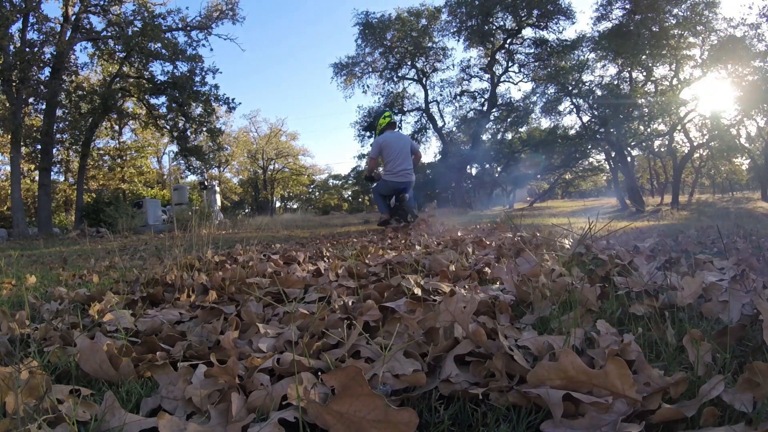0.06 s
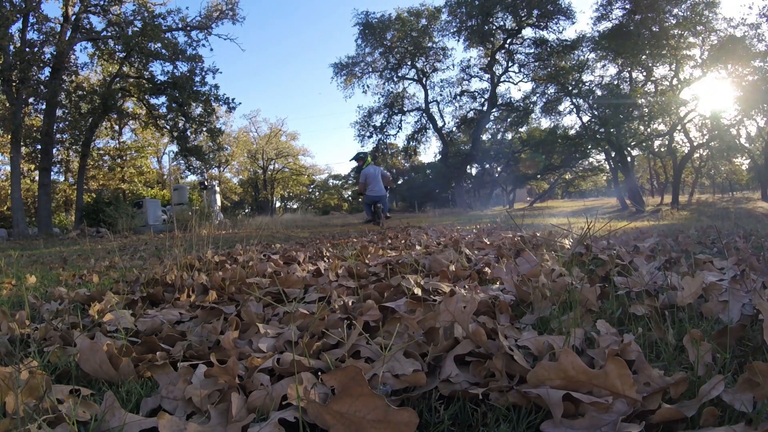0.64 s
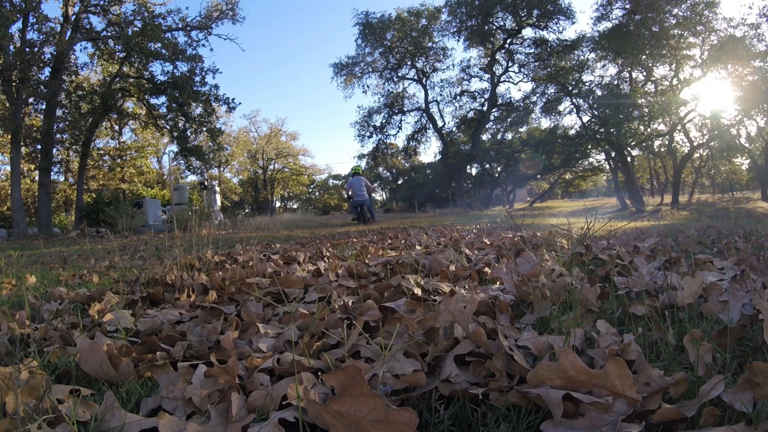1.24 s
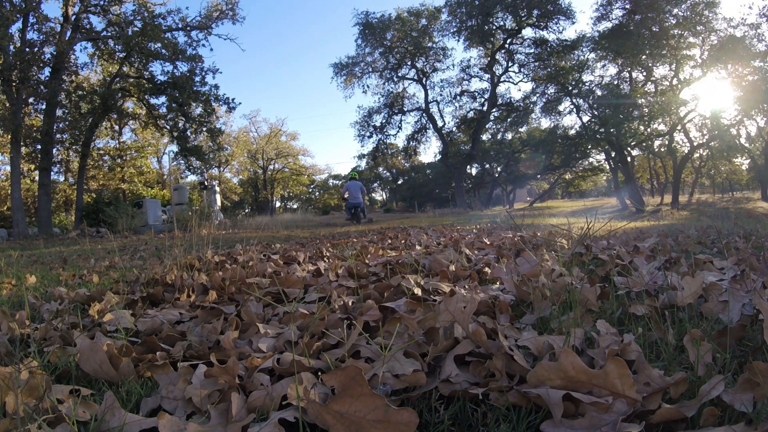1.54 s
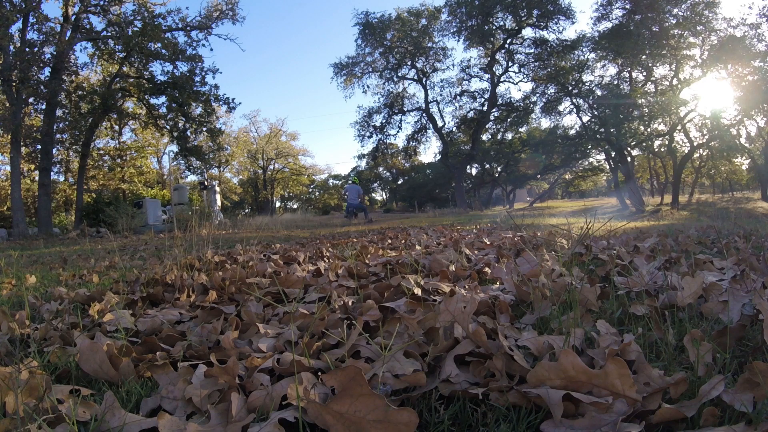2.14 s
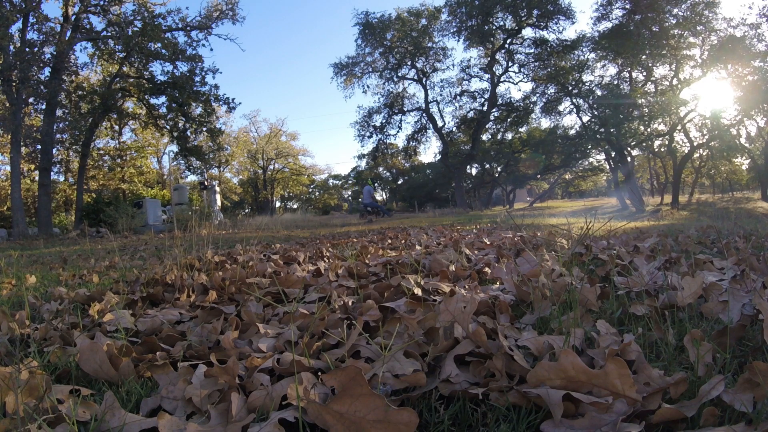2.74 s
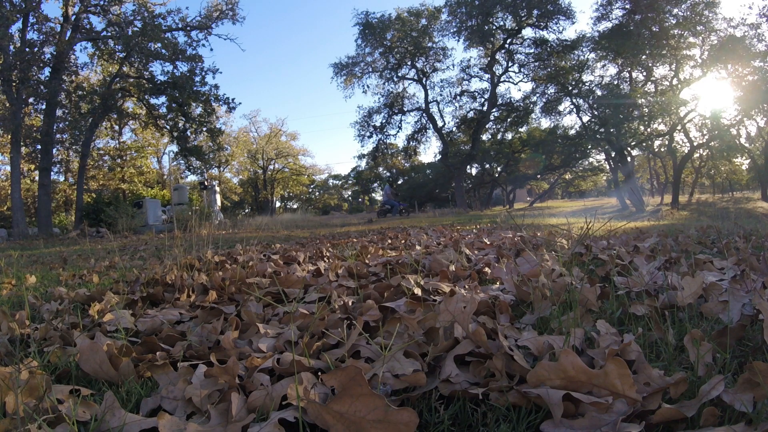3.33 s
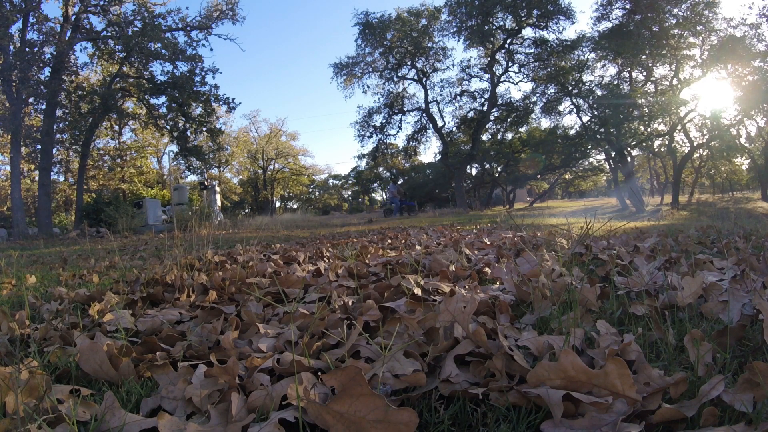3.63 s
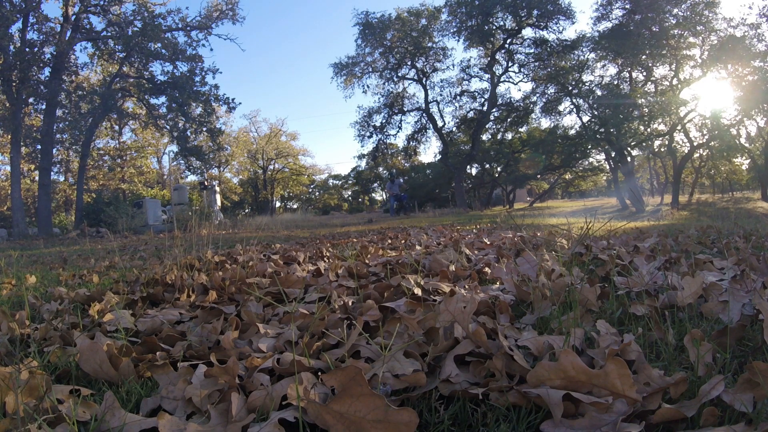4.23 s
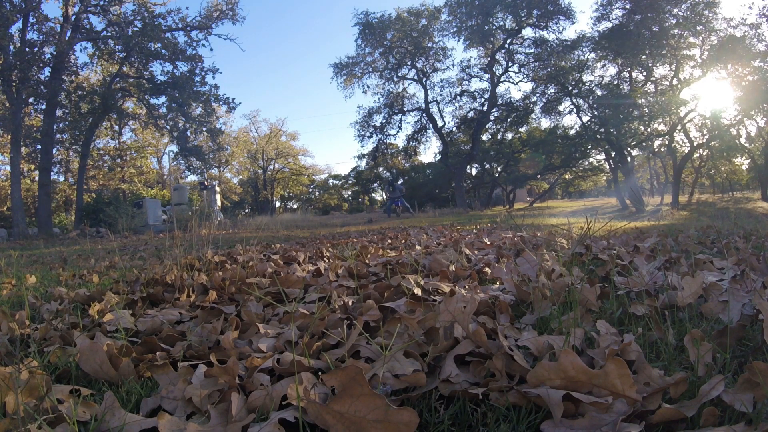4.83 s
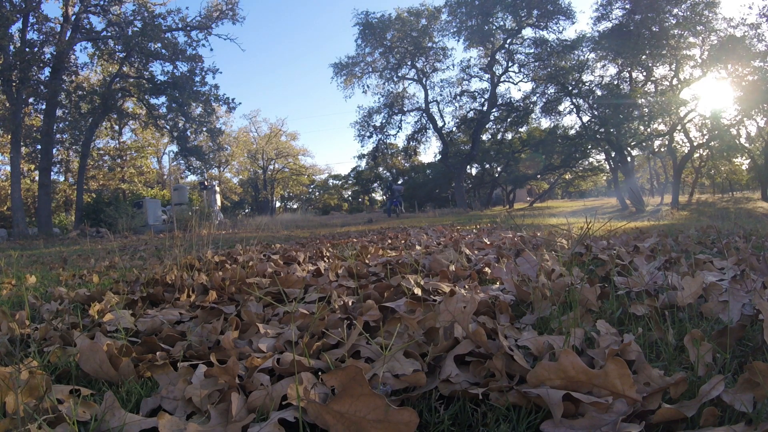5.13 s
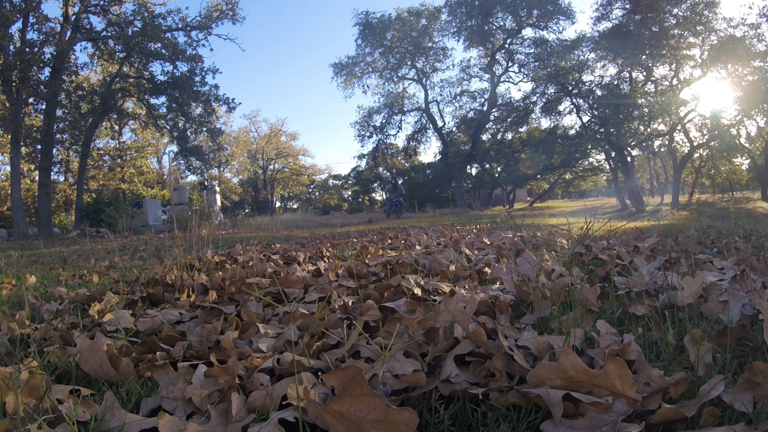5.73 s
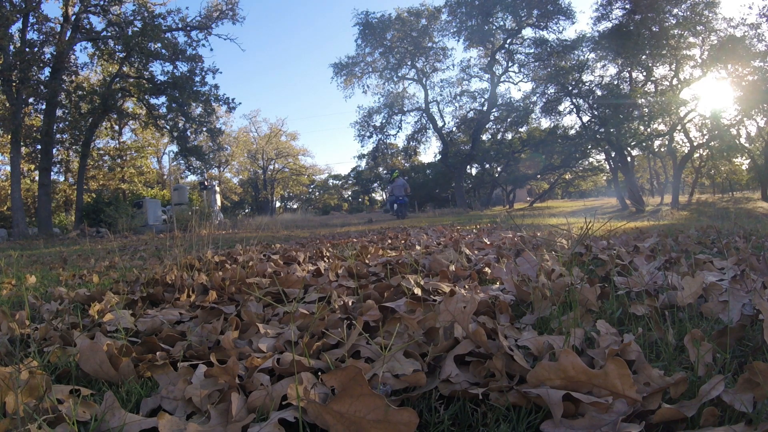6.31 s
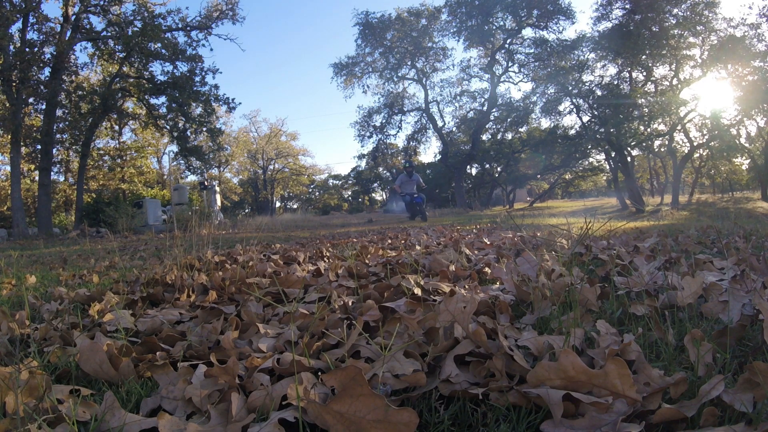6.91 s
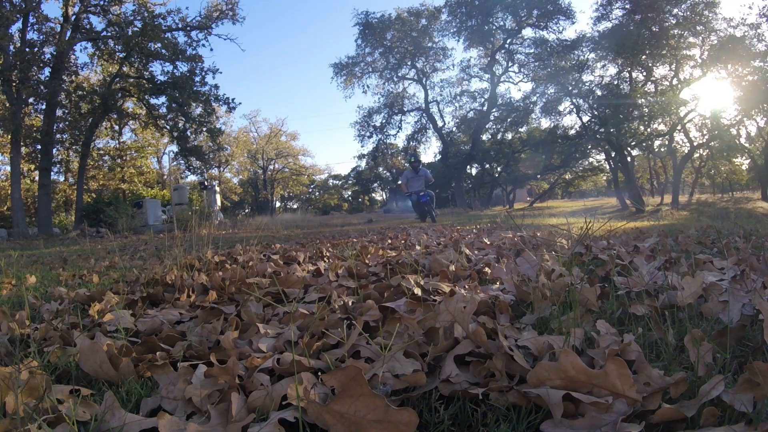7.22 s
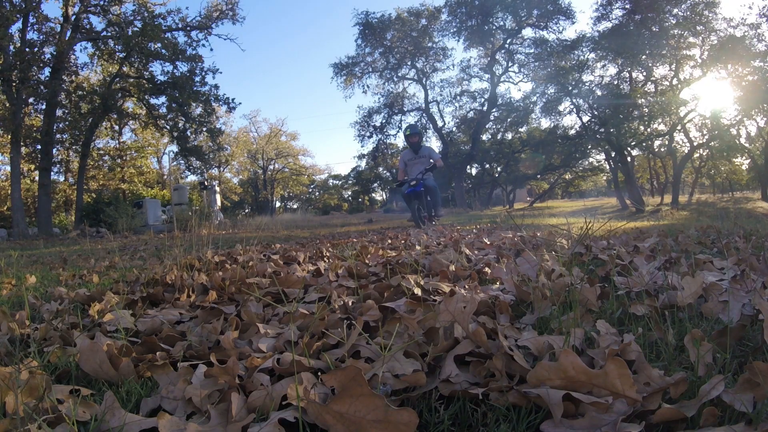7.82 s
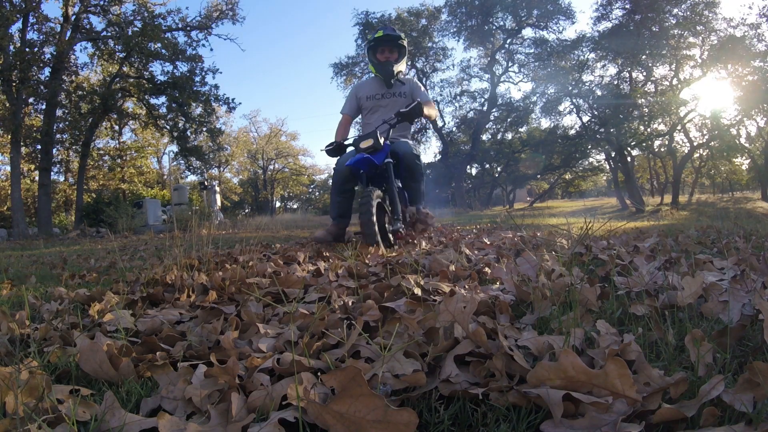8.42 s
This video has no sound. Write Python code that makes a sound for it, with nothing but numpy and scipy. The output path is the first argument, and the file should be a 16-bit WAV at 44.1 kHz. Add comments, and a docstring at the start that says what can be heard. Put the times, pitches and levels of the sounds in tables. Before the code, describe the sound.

A small two-stroke motorbike putters away over dry leaves, turns, then opens up and buzzes back to the microphone.

```python
"""A small two-stroke bike rolls away over dry leaves, idling and firing only on some turns.
Each firing thumps through the muffler, spits gas and rings the cylinder's fins.
From about 3 s the bike turns round: the cracks dull and the chain rattles.
At 5.3 s the throttle opens and every turn fires; from 6.6 s it shuts briefly three times.
The bike then buzzes up to the microphone, leaves snapping under its tyres."""
import sys
import numpy as np
from scipy import signal
from scipy.io import wavfile
from scipy.ndimage import uniform_filter1d

SR = 44100
rng = np.random.default_rng(int(sys.argv[2]) if len(sys.argv) > 2 else 0)


def digitize_waveform(pressure):
    """Quantize a signal to 16-bit integers and store it at the path in sys.argv[1].

    Rows of a 2-D input are taken as channels; values are limited to [-1, 1].
    """
    field = np.atleast_2d(pressure).T
    bounded = np.clip(field, -1, 1)
    quanta = np.round(bounded * 32767).astype(np.int16)
    wavfile.write(sys.argv[1], SR, quanta)


N = 377496
T = np.arange(N) / SR
IDLE_HZ = 61  # mean crank speed

# Spectra. Each row: frequency in Hz, relative level in dB.
THUMP_SPECTRUM = [(25, -40), (70, 9.5), (120, -1), (155, 5.5), (225, 6), (320, 2), (400, -14.5), (490, 2),
                  (650, -40), (1100, -43.5), (1600, -16.5), (2300, -44), (6000, -77)]
SUCK_SPECTRUM = [(25, -29), (80, -5.5), (150, 0), (225, 7.5), (290, -1), (390, -19.5), (465, -9),
                 (560, -29), (700, -37.5), (2000, -69)]
CRACK_SPECTRUM = [(400, -22), (1100, -12), (1650, -2), (2300, 2), (3100, 10.5), (4100, 0.5), (5200, 7.5),
                  (6200, 12.5), (7500, 5.5), (9500, -2), (14000, -8)]
CRACK_TURNED_SPECTRUM = [(400, -36), (1100, -16), (1650, -20), (2400, -7.5), (3100, 3), (4100, -9),
                         (5500, 0.5), (7500, -16), (14000, -15)]
NOTE_SPECTRUM = [(30, -54), (88, -3), (150, 0.5), (177, 3), (265, -5.5), (354, -12.5), (442, -21.5),
                 (530, -16), (640, -64.5), (1000, -37.5), (3000, -94)]
BUZZ_SPECTRUM = [(300, -25.5), (620, 0), (710, -1), (800, 2.5), (890, 5), (1060, -7.5), (1170, 3),
                 (1330, -5.5), (1580, 5), (1800, -12), (2150, -1.5), (2500, -13.5), (3350, 0),
                 (4100, -18.5), (9000, -13)]
RASP_SPECTRUM = [(40, -9), (220, -1), (450, -8), (700, -6), (1100, -5), (1600, 0), (2200, 4), (2550, 1),
                 (3350, 6.5), (4000, -3), (5500, 12.5), (7500, -3), (9700, -3.5), (13500, -26)]
PUMP_SPECTRUM = [(25, -56), (45, 5), (62, 3), (120, -13.5), (180, -33), (240, -80), (310, -19), (400, -21),
                 (440, -10), (485, -5.5), (560, -26), (700, -57.5), (4000, -96)]
CLATTER_SPECTRUM = [(350, -37), (600, -20), (684, -3), (833, 5), (1110, -14.5), (1600, 9), (1760, 5),
                    (2600, 1), (3010, 4.5), (4120, -1), (5720, 8), (7530, -3.5), (8700, -2), (10600, -31),
                    (13800, -20)]
CHAIN_SPECTRUM = [(800, -18), (1600, -7), (2100, 8), (2600, -10), (3100, 0), (4500, -28)]
LEAF_SPECTRUM = [(100, -7), (450, 1), (1000, -4.5), (1700, 4), (3000, -4.5), (6000, 2.5), (10000, -11.5),
                 (14000, -19)]
AIR_SPECTRUM = [(20, -10), (45, -3.5), (100, -5), (300, -3.5), (520, -20.5), (700, -31), (1500, -26),
                (5000, -46), (14000, -30.5)]
MICROPHONE_SPECTRUM = [(20, 0), (9700, -0.5), (10400, -17), (14000, -15.5)]
# Cooling fins and muffler shell. Each row: frequency in Hz, width in Hz, relative level in dB.
FIN_MODES = [(3330, 330, -12), (4920, 80, -4), (5208, 42, 6), (5562, 45, 9), (5740, 120, 3), (6020, 150, 3),
             (6430, 40, -2), (9740, 40, -12)]
LOOSE_FIN_MODES = [(5748, 60, 0)]
SHELL_MODES = [(852, 12, 5.5), (1010, 23, 4), (1654, 84, -5.5)]
# Level curves. Each row: time in seconds, relative level in dB.
NOTE_DB = [(5.26, -27), (5.38, -26), (5.5, -23.5), (5.8, -23), (6.35, -23), (6.8, -22), (7.35, -20.5),
           (7.75, -17.5), (8.48, -12), (8.56, -13)]
LOOSE_FIN_DB = [(6.55, -4), (6.82, -2.5), (7.25, -1.5), (7.85, -3), (8.07, 2), (8.3, -12)]
CHAIN_DB = [(0, -75), (3.5, -69), (4.05, -48), (4.4, -56), (5.3, -59)]
LEAVES_DB = [(0, -41), (.4, -56.5), (1.2, -74.5), (7, -38.5), (7.9, -30.5), (8.3, -24.5), (8.56, -20)]
# Runs of idle pops. Each row: first and last pop in seconds, pop count, relative crack level in dB.
POP_RUNS = [(0.027, 0.068, 2, -35), (0.162, 0.3, 4, -28), (0.379, 0.427, 2, -36), (0.489, 0.537, 2, -24),
            (0.633, 0.682, 2, -24), (0.779, 0.974, 5, -25), (1.057, 1.124, 2, -28),
            (1.243, 1.376, 5, -29.5), (1.444, 1.636, 5, -23.5), (1.717, 1.816, 3, -26),
            (1.88, 1.928, 2, -25.5), (2.044, 2.189, 4, -27), (2.222, 2.271, 2, -27.5),
            (2.303, 2.391, 4, -26), (2.452, 2.499, 2, -26), (2.53, 2.561, 2, -25), (2.607, 2.669, 2, -24),
            (2.716, 2.749, 2, -27.5), (2.797, 2.861, 2, -27.5), (2.962, 3.029, 3, -31),
            (3.096, 3.262, 6, -32.5), (3.415, 3.448, 2, -35), (3.551, 3.699, 4, -28),
            (3.731, 3.782, 2, -29), (3.880, 4.042, 6, -32.5), (4.091, 4.137, 2, -34),
            (4.270, 4.337, 3, -36), (4.42, 4.567, 4, -34), (4.633, 4.681, 2, -32.5), (4.766, 4.911, 4, -33),
            (4.946, 5.044, 4, -38), (5.078, 5.127, 2, -35), (5.195, 5.290, 3, -35)]
# Swing of the exhaust pipe. Each row: time in seconds, share turned away from 0 to 1.
PIPE_TURNED = [(2.8, 0), (3.3, 0.53), (3.6, 0.56), (4.1, 1)]
# Open throttle, two consecutive spans. Each row: time in seconds, crank speed in Hz.
CRANK_HZ = [
    [(5.26, 67.5), (5.298, 69.6), (5.35, 77.8), (5.462, 86.1), (5.542, 90.7), (5.736, 88.4), (6.114, 89.0),
     (6.244, 90.7), (6.56, 89.4)],
    [(7.24, 88.2), (7.408, 89.6), (7.54, 88.5), (7.996, 88.7), (8.04, 88.0), (8.188, 88.3), (8.272, 89.4),
     (8.376, 87.7), (8.56, 87.0)],
]
# Throttle cuts. Each row: shut time in seconds, reopen time in seconds.
SHUTS_S = [(6.589, 6.712), (6.850, 6.924), (7.046, 7.103)]


def driving(knock_turns=.52, steady_hz=85, treble_dip=1.6, ring_pulsing=.68, ref_db=-20):
    """Under throttle every turn fires: exhaust note, knock buzz, gas rasp and fin ring."""
    hz, dip_db = throttling()
    note_db = curve(NOTE_DB)
    # The treble grows faster than the note and dips deeper.
    rise_db, treble_db = note_db - ref_db, treble_dip * dip_db
    rasp_db = -33 + 1.37 * rise_db + treble_db
    buzz_db = -34 + 1.47 * rise_db + treble_db
    ring_db = -31 + 1.58 * rise_db + treble_db
    turns = np.cumsum(hz) / SR
    fire_s = strokes(turns)
    uneven = 1 + np.clip(steady_hz - np.interp(fire_s, T, hz), 0, 10)
    fire_s = fire_s + 18e-6 * uneven * rng.standard_normal(len(fire_s))
    force = scatter(fire_s, spread_db=.25 * uneven)
    exhaust = amp(note_db + dip_db) * unit(colour(clicks(fire_s, force), NOTE_SPECTRUM))
    knocks = clicks(fire_s + knock_turns / np.interp(fire_s, T, hz), force)
    since_knock = (turns - knock_turns) % 1
    flare = .33 + np.sin(np.pi * np.sqrt(since_knock)) ** 2
    rasp = amp(rasp_db) * unit(colour(flare * noise(), RASP_SPECTRUM))
    buzz = amp(buzz_db) * ground(colour(knocks, BUZZ_SPECTRUM))
    ring_flare = flare ** ring_pulsing
    fins = ringing(knocks, FIN_MODES) + .6 * ringing(noise(), FIN_MODES)
    fins = unit(ring_flare * ground(fins, gain=.2, sway_s=.00008))
    loose_fin = amp(curve(LOOSE_FIN_DB)) * unit(ring_flare * ringing(noise(), LOOSE_FIN_MODES))
    return exhaust + buzz + rasp + amp(ring_db) * (fins + loose_fin)


def throttling(coast_hz_per_s=160, sink_db_per_s=118, pickup_s=.06, return_s=.022):
    """Crank speed and level dip: both sink while shut; the level recovers first."""
    hz = curve(CRANK_HZ[0] + CRANK_HZ[1])
    dip_db = np.zeros(N)
    for shut_s, reopen_s in SHUTS_S:
        coasted_s = np.clip(T - shut_s, 0, reopen_s - shut_s)
        open_s = np.maximum(T - reopen_s, 0)
        hz -= coast_hz_per_s * coasted_s * np.exp(-(open_s / pickup_s) ** 2)
        dip_db -= sink_db_per_s * coasted_s * np.exp(-(open_s / return_s) ** 2)
    return hz, dip_db


def popping(lag_s=.000821, snap_s=.002, tail_s=.0066, ring_lag_s=.0037, ring_decay_s=.0033):
    """Single firings: a low thump, a shock with a spit of gas behind it, a brief fin ring."""
    fire_s, crack_db = idle_firings()
    crack_db = crack_db + .3 * rng.standard_normal(len(fire_s))
    thump_db = -.5 + .36 * (crack_db + 25)
    # Charge gathered while the throttle is shut goes off as one dull pop.
    reopenings = [(reopen_s, -30, 3.5) for _, reopen_s in SHUTS_S]
    fire_s, crack_db, thump_db = np.hstack([[fire_s, crack_db, thump_db], np.transpose(reopenings)])
    fire_s = fire_s + lag_s
    thump = colour(clicks(fire_s, amp(thump_db)), THUMP_SPECTRUM)
    # A turn later the port opens on the cooled cylinder and sucks gas back.
    suck = .5 * colour(clicks(fire_s + .975 / IDLE_HZ, amp(thump_db)), SUCK_SPECTRUM)
    t = T[:SR // 25]
    burst = np.exp(-t / snap_s) + amp(-12) * np.exp(-t / tail_s)
    shock = clicks(fire_s, amp(crack_db))
    spit = .55 * shock + convolve(shock, burst / np.linalg.norm(burst)) * noise()
    # The pipe beams treble backwards, so turning dulls the cracks.
    turned = curve(PIPE_TURNED)
    cracks = (1 - turned) * colour(spit, CRACK_SPECTRUM) + turned * colour(spit, CRACK_TURNED_SPECTRUM)
    ring_envelope = convolve(clicks(fire_s + ring_lag_s, amp(crack_db)), np.exp(-t / ring_decay_s))
    ring = ring_envelope * ringing(noise(), FIN_MODES)
    return thump - suck + amp(19) * cracks + amp(-5) * ring


def idle_firings(pause_s=.078, catch_db=-8):
    """Pop times and crack levels; after a pause the engine catches weakly two turns early."""
    pops = []
    for first_s, last_s, count, db in POP_RUNS:
        if pops and first_s - pops[-1][0] > pause_s:
            pops.append((first_s - 2 / IDLE_HZ, db + catch_db))
        pops += [(s, db) for s in np.linspace(first_s, last_s, count)]
    return np.transpose(pops)


def idling(lag_s=.00292, db_per_hz=.5, close_db=3, recede_s=.24, slap_turns=.053):
    """Fired or not, every turn pumps air through the muffler and rattles the piston."""
    turns = idle_turns()
    hz = uniform_filter1d(np.gradient(turns) * SR, size=SR // 10)
    speed_db = db_per_hz * (hz - IDLE_HZ)
    stroke_s = strokes(turns)
    pump = unit(colour(clicks(stroke_s + lag_s, -scatter(stroke_s, spread_db=2)), PUMP_SPECTRUM))
    rattle = noise() * (2 + np.exp(-(turns % 1) / slap_turns))
    clatter = unit(colour(rattle, CLATTER_SPECTRUM))
    clatter += amp(-9) * ringing(rattle, FIN_MODES) + amp(-13) * ringing(rattle, SHELL_MODES)
    near_db = close_db * np.exp(-T / recede_s)
    return amp(-38.5 + speed_db) * pump + amp(-49 + speed_db + near_db) * clatter


def idle_turns():
    """Crank angle in turns; a whole number of them lies between firings."""
    fire_s = idle_firings()[0]
    fire_s = np.concatenate([[fire_s[0] - 2 / IDLE_HZ], fire_s, [fire_s[-1] + 10]])
    gap_turns = np.round(np.diff(fire_s, prepend=fire_s[0]) * IDLE_HZ)
    return np.interp(T, fire_s, np.cumsum(np.maximum(gap_turns, 0)))


def chain():
    """Chain rattle as a band of noise, loudest as the bike turns."""
    return amp(curve(CHAIN_DB)) * unit(colour(noise(), CHAIN_SPECTRUM))


def leaves(snaps_per_s=4000, spread_db=2.5):
    """Dry leaves snap under the tyres while the bike is near."""
    snaps = noise() * (rng.random(N) < snaps_per_s / SR)
    snaps *= amp(spread_db * np.minimum(rng.exponential(1, N), 3))
    return amp(curve(LEAVES_DB)) * unit(colour(snaps, LEAF_SPECTRUM))


def ground(x, gain=.66, sway_s=.000417):
    """Adds two echoes off uneven ground, their paths shifting as the bike moves; rms 1."""
    echoes = sum(np.interp(T - delay_s - sway_s * wander(top_hz=1.6), T, x) for delay_s in (.003, .008))
    return unit(x + gain * echoes)


def trees(x, t60_s=.16, delay_s=.048, echoes_per_s=1500):
    """Scattered echoes off the trunks round the field."""
    t = T[:SR]
    taps = rng.standard_normal(SR) * (rng.random(SR) < echoes_per_s / SR)
    taps *= (t > delay_s) * amp(-60 * t / t60_s)
    return convolve(x, taps / np.linalg.norm(taps))


def open_air():
    """Steady, mostly low background noise."""
    return amp(-42) * colour(noise(), AIR_SPECTRUM)


def amp(db):
    """Decibels to gain."""
    return 10 ** (np.asarray(db) / 20)


def unit(x):
    """Scales to rms 1."""
    return x / np.sqrt(np.mean(x ** 2) + 1e-20)


def noise():
    """White noise of rms 1."""
    return rng.standard_normal(N)


def curve(rows):
    """A time table at every sample."""
    return np.interp(T, *np.transpose(rows))


def convolve(x, impulse):
    """Convolution cut to N samples."""
    return signal.oaconvolve(x, impulse)[:N]


def response(spectrum):
    """Minimum-phase impulse response of energy 1."""
    hz, db = np.transpose(spectrum)
    bin_hz = abs(np.fft.fftfreq(8192, 1 / SR))
    log_gain = np.log(amp(np.interp(np.log(bin_hz + 1), np.log(hz), db)))
    impulse = np.fft.ifft(np.exp(np.conj(signal.hilbert(log_gain)))).real[:len(bin_hz) // 2]
    return impulse / np.linalg.norm(impulse)


def colour(x, spectrum):
    """Filters x by a spectrum."""
    return convolve(x, response(spectrum))


def ringing(x, modes):
    """Rings damped metal modes with x; rms 1."""
    t = T[:SR // 16]
    impulse = sum(amp(db) * np.sqrt(width_hz) * np.exp(-np.pi * width_hz * t) * np.sin(2 * np.pi * hz * t)
                  for hz, width_hz, db in modes)
    return unit(convolve(x, impulse))


def clicks(times_s, gains):
    """Windowed-sinc impulses, timed between samples."""
    place = np.asarray(times_s)[:, None] * SR
    index = np.floor(place).astype(int) + np.arange(-7, 9)
    shape = np.sinc(index - place) * np.sinc((index - place) / 8)
    inside = (index >= 0) & (index < N)
    return np.bincount(index[inside], (shape * gains[:, None])[inside], N)


def strokes(turns):
    """Times in seconds at which the crank completes a turn."""
    return np.interp(np.arange(np.ceil(turns[0]), turns[-1]), turns, T)


def scatter(times_s, spread_db):
    """A random gain per stroke."""
    return amp(spread_db * rng.standard_normal(len(times_s)))


def wander(top_hz):
    """Smooth random drift of rms 1."""
    rates_hz = np.geomspace(top_hz / 5, top_hz, 12)
    return unit(sum(np.sin(2 * np.pi * (hz * T + rng.random())) for hz in rates_hz))


def scene(throttle_s=5.285, opening_s=.034, echo_db=-23):
    """Idle gives way to open throttle, amid trees and open air."""
    throttle = np.clip((T - throttle_s) / opening_s + .5, 0, 1)
    bike = (1 - throttle) * (idling() + chain()) + popping() + throttle * driving() + leaves()
    return (bike + open_air() + amp(echo_db) * trees(bike))[None]


def record(dry, knee=7, cutoff_hz=13900):
    """Microphone: dull top, soft clip at full scale, band limit."""
    microphone = response(MICROPHONE_SPECTRUM)
    heard = signal.oaconvolve(dry, microphone[None] / microphone.sum())[:, :N]
    clipped = heard / (1 + abs(heard) ** knee) ** (1 / knee)
    lowpass = signal.firwin(255, cutoff_hz, window=("kaiser", 9), fs=SR)
    return signal.oaconvolve(clipped, lowpass[None], "same")


dry = scene()
out = record(dry)
digitize_waveform(out)
```